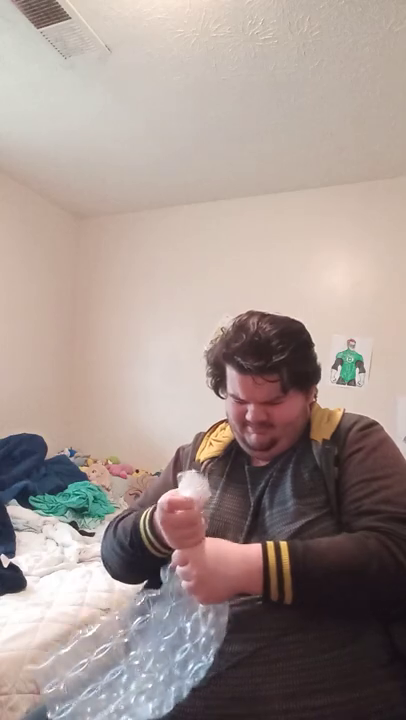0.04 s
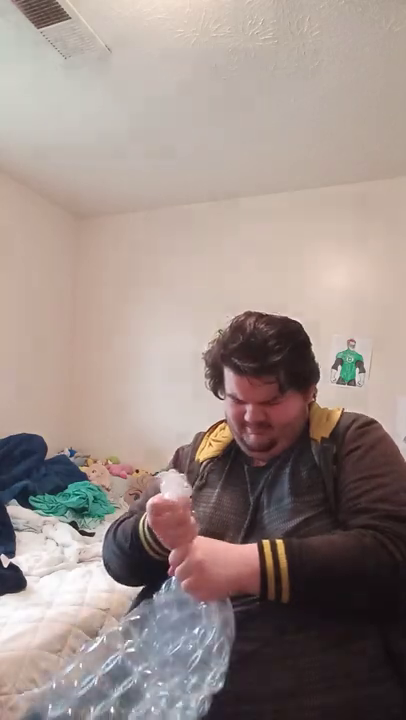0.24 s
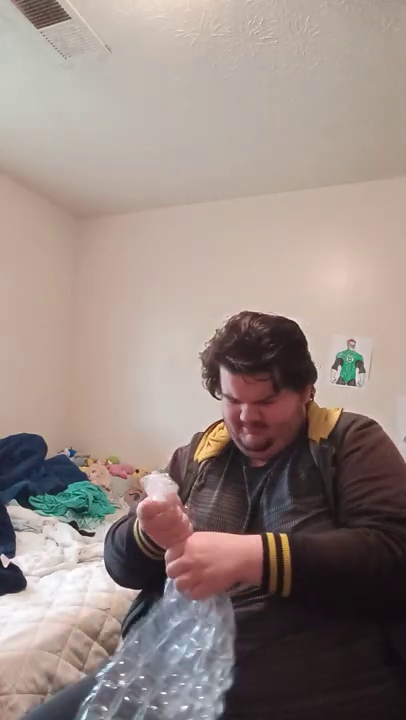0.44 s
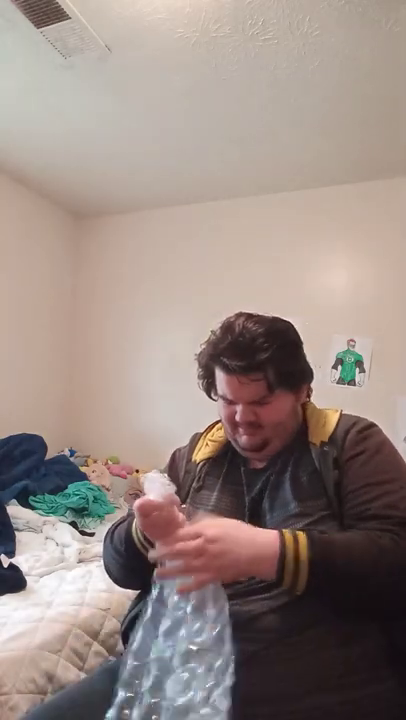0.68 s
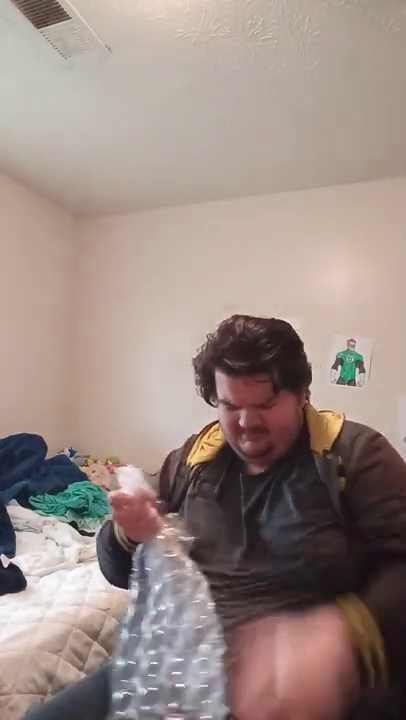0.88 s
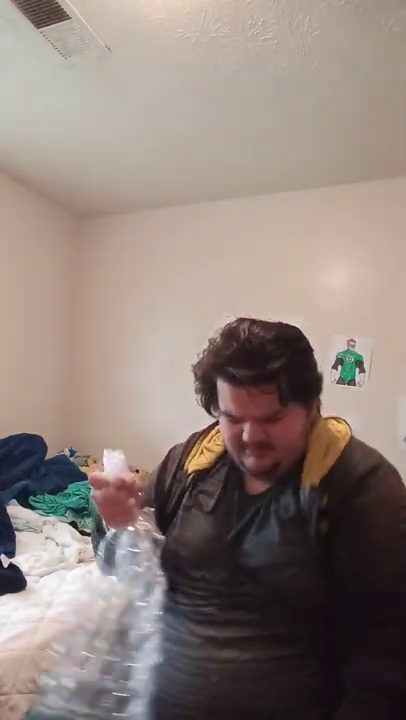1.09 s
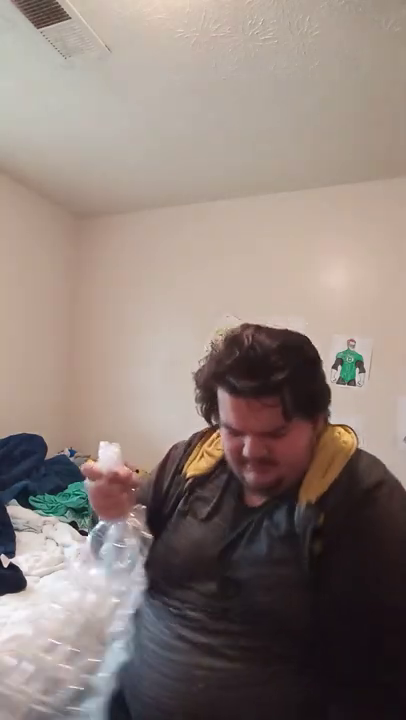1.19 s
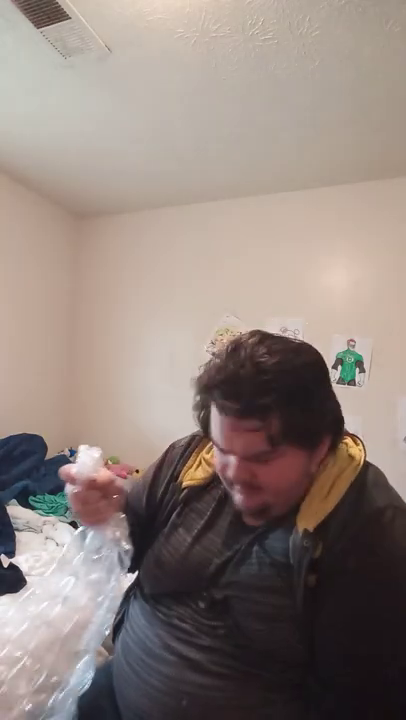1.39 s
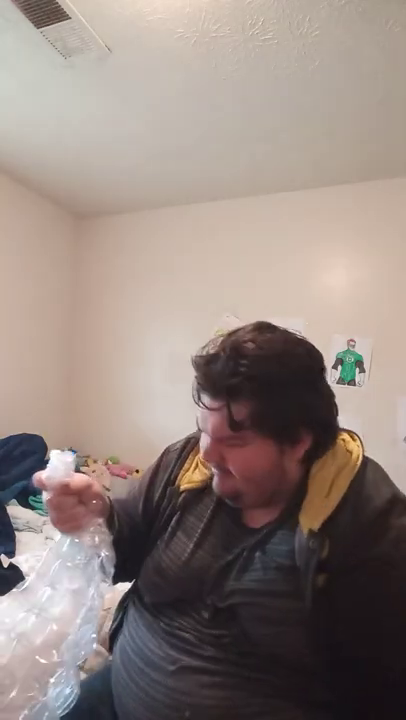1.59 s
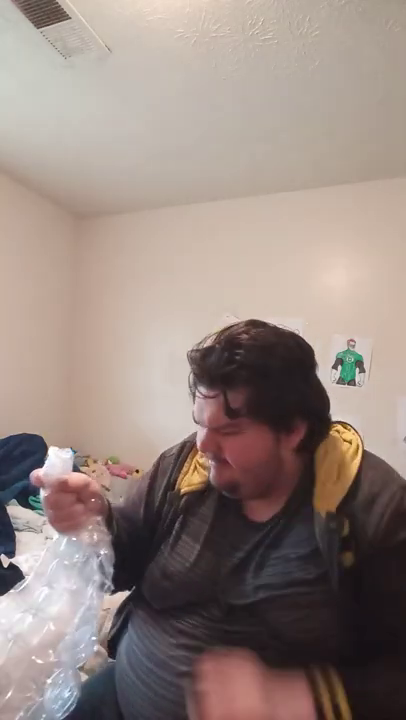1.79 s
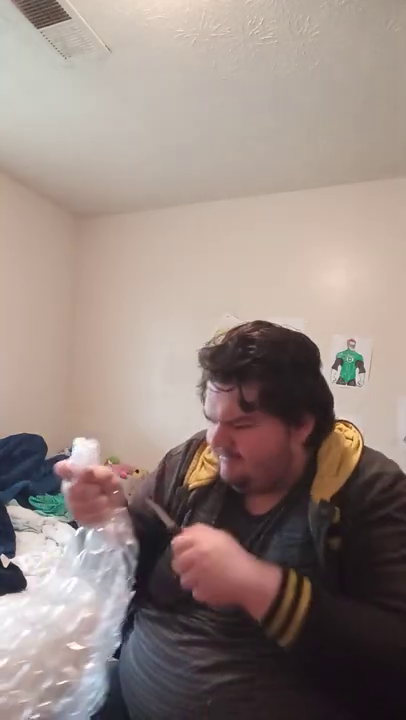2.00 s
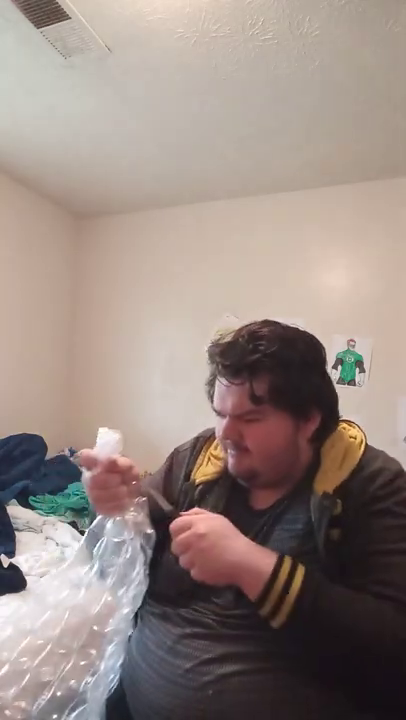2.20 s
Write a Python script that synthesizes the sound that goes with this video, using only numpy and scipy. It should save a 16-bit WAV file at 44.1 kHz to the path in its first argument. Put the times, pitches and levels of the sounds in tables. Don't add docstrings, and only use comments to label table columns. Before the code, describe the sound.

Bubble wrap wrung by hand, a few cells popping sharply amid crackling film in a bedroom

```python
import sys
import numpy as np
from scipy import signal
from scipy.fft import rfft, irfft
from scipy.io import wavfile
from scipy.ndimage import uniform_filter1d

SR = 44100
rng = np.random.default_rng(int(sys.argv[2]) if len(sys.argv) > 2 else 0)


def int16_out(signal):
    q = np.round(np.clip(np.atleast_2d(signal).T, -1, 1) * 32767)
    wavfile.write(sys.argv[1], SR, q.astype(np.int16))


def undo_db(level):
    steps = np.asarray(level, float) / 20
    return 10 ** steps


N = 99225
LEAD_S = 0.1

POP_TIMES = [.0847, .0849, .1169, .2046, .2274, .529, .599, .6394, .6405, .7315, .739, .770, .7918, .793,
             .805, 1.0543, 1.317, 1.391, 1.395, 1.413, 1.437, 1.481, 1.532, 1.666]
# peak in dB, ring in Hz, Q, thump in dB, air in dB.
POP_SOUNDS = [(-29.5, 1150, 4, -33.5, -9), (-10.5, 3140, 2, -22, 5), (1.5, 3360, 2, -17, 0),
              (10, 4420, 1.63, -18, -21), (0, 5000, 2.2, -47.5, -3), (-13.5, 4000, 1.9, -50.5, -26),
              (-12, 460, 2.5, 3, -25), (0.5, 2200, 2.2, 3.5, -28), (-7.5, 3400, 6.5, -27, -30),
              (-13, 4100, 6.6, -21, -15), (-5.5, 830, 2.2, 0, -19), (-14.5, 2400, 9.2, -27, -30),
              (-3.5, 1700, 0.61, -14, -30), (-13.5, 450, 3.7, -20, -45.5), (-14, 392, 3.4, -19, -40),
              (-33, 1960, 1.6, -29.5, -10.5), (-13, 1720, 11, -13, -31), (-13, 2350, 4.3, -5.5, -10),
              (-11, 2500, 5, -20, -18), (-3, 2200, 2.4, -20, -13), (-6, 2600, 5, -22, -18),
              (-32, 1600, .66, -15, -19), (-5.5, 740, 2.2, -4, -35), (-34.5, 2600, 2.7, -20, -19)]
POP_WALL_SENDS = [-3.5, -6, -3.5, 2.5, -25, -18, -12, -8, -17, -21.5, -27, -26.5, -16, -25, -19, 11.5, -20,
                  4.5, -19, -26, -25, -21, -28, 13]
RUSTLE_TIMES = [-.04, .403, .47, .568, .64, .706, .79, .899, .956, 1.055, 1.173, 1.195, 1.39, 1.478, 1.6,
                1.665, 1.75, 1.8, 1.93]
# length in seconds, level in dB, centre in Hz, thump in dB, air in dB.
RUSTLE_SOUNDS = [(.037, -47, 2780, -17.5, 2), (.17, -47, 3160, -52, -13), (0.18, -52.5, 4400, -42, 3.5),
                 (0.11, -39.5, 5600, -50, 5), (0.057, -53, 3200, 0.5, -10), (0.076, -43, 2860, -3.5, 1.5),
                 (0.012, -44.5, 2360, 0, 4), (0.039, -50.5, 2000, 3, -18), (0.036, -45.5, 2140, -3.5, -2),
                 (0.011, -39, 2430, -19, -6), (0.026, -51, 7800, -26, -6.5), (0.02, -52, 3000, -23, 8.5),
                 (0.016, -32.5, 3250, -36.5, -3.5), (0.019, -38.5, 2600, -1.5, -2),
                 (0.051, -54, 4500, -30, 0), (0.02, -58, 2000, -30, -14), (.06, -60, 6000, -30, -5),
                 (0.1, -60.5, 4400, -17, 6), (0.08, -65, 8500, -26, -13)]
# moment in seconds, peak in dB.
FILM_TICKS = [(0.451, -45), (0.465, -42), (0.497, -33), (0.5085, -29), (0.5615, -37), (0.5874, -42),
              (0.5984, -33), (.4845, -46), (.49, -44), (0.72, -35), (0.7915, -46), (0.8235, -40),
              (0.889, -40), (0.9741, -61), (0.981, -47), (1.0209, -40), (1.0604, -39), (1.207, -65)]
# start in seconds, length in seconds, level in dB.
SCRAPE_EVENTS = [
    (1.273, 0.023, -47),
    (1.292, 0.037, -40.5),
    (1.332, .065, -44),
    (1.386, 0.05, -41.5),
    (1.469, 0.049, -41),
    (1.67, 0.01, -66),
]
# frequency in Hz, width in Hz, level in dB.
SURFACE_MODES = [(403, 50, 2.5), (579, 27, 2.5), (663, 33, 2.5), (806, 52, 3), (1080, 56, -7.5),
                 (1375, 85, -3), (1682, 34, 6.5), (2290, 330, 3.5), (2627, 34.5, 2.5), (3390, 120, -0.5)]
BUMP_TIMES = [.12, .591, .67, .717, .788, .205, .912, 1.125, 1.196, 1.2, 1.212, 1.294, 1.44, 1.469, 1.53,
              1.58, 1.59, 1.673, 1.72, 1.805, 1.945]
# length in seconds, level in dB, resonance in Hz, Q.
BUMP_SOUNDS = [(0.051, -54.5, 300, 2.9), (0.027, -52, 590, 0.81), (.04, -62.5, 160, 3),
               (0.066, -47, 179, 1.3), (0.042, -41, 420, 2.6), (0.043, -39, 280, 2), (0.054, -44, 532, 4.2),
               (0.088, -52, 2030, 14), (0.041, -50, 413, 12.4), (0.091, -60, 1860, 8),
               (0.064, -52, 203, 2.1), (0.135, -53, 564, 5), (0.061, -43.5, 135, 2.6),
               (0.096, -41.5, 415, 1.5), (0.048, -44.5, 120, 0.77), (0.1, -50, 1970, 8),
               (0.07, -44.5, 144, 2), (0.03, -51, 540, 2.1), (.17, -65.5, 1800, 4.5),
               (0.16, -55, 254, 1.53), (0.083, -62, 1750, 5.2)]
# delay in seconds, level in dB.
EARLY_ECHOES = [(.0014, 0), (.0057, -2), (.0075, -0.5), (.0088, 0), (0.0114, -8), (0.0224, -5), (0.026, -3)]
# band in Hz, T60 in seconds.
ROOM_DECAY = [(150, 0.36), (450, 0.54), (850, 0.25), (1600, 0.49), (4000, 0.41), (8000, 0.35),
              (13000, 0.093)]
# frequency in Hz, density in dB per Hz.
NOISE_COLOUR = [(40, -38), (120, -12.5), (230, -2.5), (600, -6), (1750, -12), (7000, -21), (10000, -37),
                (13000, -25)]
# frequency in Hz, response in dB.
MIC_COLOUR = [(60, -45), (280, -9.5), (430, 3), (5800, -4.5), (7500, -8.5), (10200, -20), (11500, -17),
              (15800, -13)]
# frequency in Hz, level of a spectral cell in dB.
SUPPRESSOR_EDGE = [(100, -90.5), (350, -62), (800, -75), (1500, -79.5), (1900, -89), (5000, -88),
                   (10000, -91.5), (15000, -95)]
# time in seconds, gain in dB.
GAIN_RIDE = [(0, 3.5), (0.185, -0.5), (0.19, -6), (0.2025, -21), (0.2038, 2), (0.24, -3.5), (0.301, 5.5),
             (0.372, 11), (0.452, 3.5), (.56, 1), (1.098, -3), (1.17, -9), (1.27, -0.5), (1.559, -5.5),
             (1.651, -15), (1.678, -1.5), (1.78, -7.5), (2.25, -4)]


def level(x, db):
    return x * undo_db(db) / np.sqrt(np.mean(x ** 2) + 1e-30)


def ring(x, hz, q):
    return signal.lfilter(*signal.iirpeak(hz, q, fs=SR), x)


def high(x, hz, order=4):
    return signal.sosfilt(signal.butter(order, hz, "high", fs=SR, output="sos"), x)


def add(out, x, t):
    i = int((t + LEAD_S) * SR)
    out[i:i + len(x)] += x[:len(out) - i]


def minimum_phase(points, size):
    hz, db = np.array(points, float).T
    f = np.maximum(np.fft.rfftfreq(size, 1 / SR), 1)
    cepstrum = irfft(np.log(undo_db(np.interp(np.log(f), np.log(hz), db))))
    cepstrum[1:size // 2] *= 2
    cepstrum[size // 2 + 1:] = 0
    return irfft(np.exp(rfft(cepstrum)))


def ring_thump_air(x, hz, q, thump_db, air_db):
    thump = ring(ring(x, 710, 0.2), 710, 0.2)
    return level(ring(x, hz, q), 0) + level(thump, thump_db) + level(high(x, 11200), air_db)


def grains(length):
    grains_per_s, spread_db, attack_share = 5000, 3.0, 0.14
    n = int(length * SR)
    u = np.arange(n) / n
    hit = rng.random(n) < grains_per_s / SR
    sign = np.sign(rng.random(n) - 0.5)
    size = undo_db(-spread_db * np.log(rng.random(n) + 0.063))
    swell = np.minimum(u / attack_share, (1 - u) / (1 - attack_share)) ** 0.7
    return np.r_[hit * sign * size * swell, np.zeros(1024)]


def pops(near, walls):
    click = np.r_[1.0, -0.4, np.zeros(1024)]
    for t, (db, *tone), send_db in zip(POP_TIMES, POP_SOUNDS, POP_WALL_SENDS):
        pop = ring_thump_air(click, *tone)
        pop = pop / np.abs(pop).max() * undo_db(db)
        add(near, pop, t)
        add(walls, pop * undo_db(send_db), t)
    return near, walls


def rustles(out):
    for t, (length, db, hz, thump_db, air_db) in zip(RUSTLE_TIMES, RUSTLE_SOUNDS):
        crackle = ring_thump_air(grains(length), hz, 0.93, thump_db, air_db)
        add(out, undo_db(db) * crackle, t)
    return out


def ticks(out):
    for t, db in FILM_TICKS:
        burst = rng.standard_normal(256) * np.exp(-np.arange(256) / 23.0)
        tick = high(burst, 11000, order=2)
        add(out, tick / np.abs(tick).max() * undo_db(db + 20.5), t)
    return out


def scrapes(out):
    wander, vary_db = 0.015, 2.0
    for t, length, db in SCRAPE_EVENTS:
        x = grains(length)
        body = 0
        for hz, width, mode_db in SURFACE_MODES:
            shift, lift = rng.standard_normal(2)
            mode = ring(x, hz * (1 + wander * shift), hz / width)
            body = body + level(mode, mode_db + vary_db * lift)
        hiss = ring_thump_air(x, 1950, 1.0, 2, -29)
        add(out, undo_db(db) * (level(body, 0) + level(hiss, -1.5)), t)
    return out


def bumps(out):
    for t, (length, db, hz, q) in zip(BUMP_TIMES, BUMP_SOUNDS):
        push = ring(ring(grains(length), hz, q), hz, q)
        add(out, level(push, db), t)
    return out


def room():
    t = np.arange(SR // 2) / SR
    tail = 0
    for hz, t60 in ROOM_DECAY:
        band = ring(ring(rng.standard_normal(len(t)), hz, 0.7), hz, 0.7)
        tail = tail + level(band, 0) * np.sqrt(hz / 5300.0) * undo_db(-60 * t / t60)
    h = undo_db(-26) * tail * (1 - np.exp(-t / 0.006))
    for delay, db in EARLY_ECHOES:
        puff = rng.standard_normal(256) * np.exp(-t[:256] / 0.00041)
        i = int(delay * SR)
        h[i:i + 256] += undo_db(db) * puff / np.sqrt(np.sum(puff ** 2))
    return h


def self_noise():
    hum = signal.fftconvolve(rng.standard_normal(N + 4096), minimum_phase(NOISE_COLOUR, 4096))[4096:4096 + N]
    hold = 1500
    steps = np.repeat(rng.standard_normal(N // hold + 1), hold)
    flicker_db = 1.5 * uniform_filter1d(steps, hold)[:N]
    return level(hum * undo_db(flicker_db), -66.5)


def suppress(x):
    f, _, cells = signal.stft(x, SR, nperseg=512)
    hz, db = np.array(SUPPRESSOR_EDGE, float).T
    power = uniform_filter1d(np.abs(cells) ** 2, size=5, axis=-2)
    power = uniform_filter1d(power, size=3, axis=-1)
    edge = undo_db(np.interp(np.log(f + 1), np.log(hz), db))[:, None] ** 2
    gain = np.maximum(power / (power + edge), undo_db(-12))
    return signal.istft(cells * gain, SR, nperseg=512)[1][..., :N]


def scene():
    lead = int(LEAD_S * SR)
    size = N + lead
    near, pop_send = pops(np.zeros(size), np.zeros(size))
    film = rustles(np.zeros(size)) + scrapes(np.zeros(size))
    soft = high(bumps(np.zeros(size)), 120, order=2)
    walls = signal.fftconvolve(pop_send + film + undo_db(-15.5) * soft, room())[:size]
    air = near + film + ticks(np.zeros(size)) + walls
    heard = signal.fftconvolve(air, minimum_phase(MIC_COLOUR, 2048))[:size]
    mix = heard * undo_db(-4.0) + soft
    return mix[lead:][None]


def top_cut(x):
    return signal.sosfilt(signal.butter(12, 16810, fs=SR, output="sos"), x)


def record(dry):
    s, db = np.array(GAIN_RIDE, float).T
    x = (suppress(dry) + self_noise()) * undo_db(np.interp(np.arange(N) / SR, s, db))
    ceiling = 0.93
    x = np.tanh(x / ceiling) * ceiling
    x = high(x, 70, order=2)
    top = signal.ellip(10, 0.2, 60, 15800, fs=SR, output="sos")
    return top_cut(signal.sosfilt(top, x))


dry = scene()
out = record(dry)
int16_out(out)
```